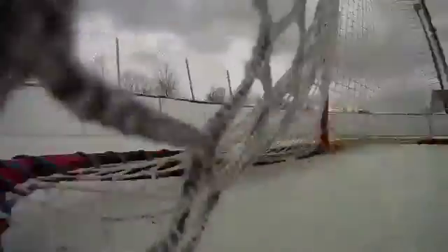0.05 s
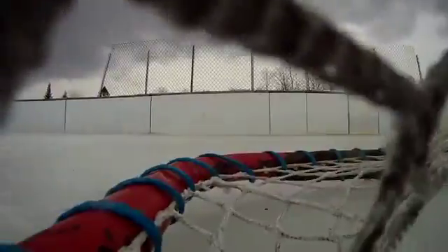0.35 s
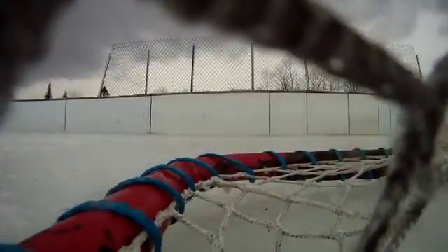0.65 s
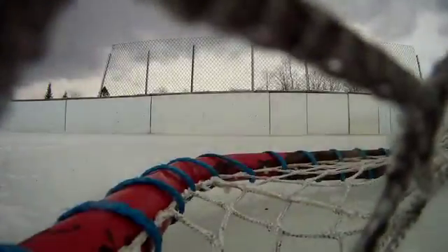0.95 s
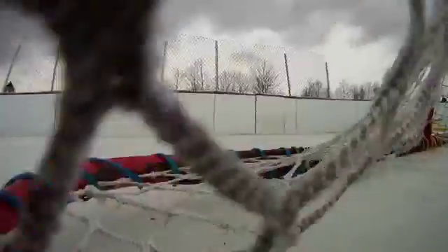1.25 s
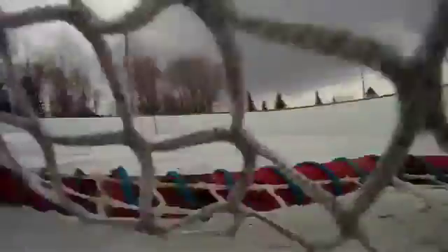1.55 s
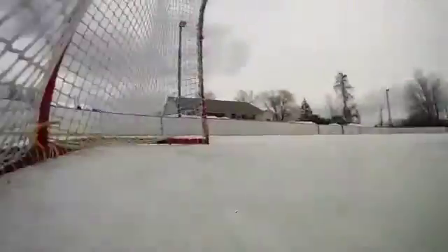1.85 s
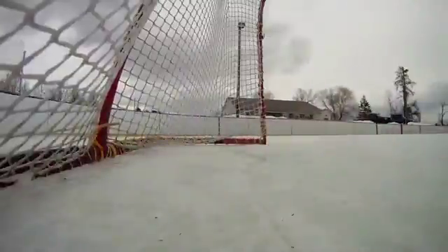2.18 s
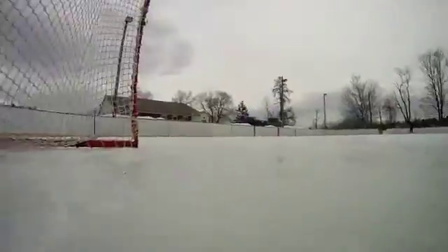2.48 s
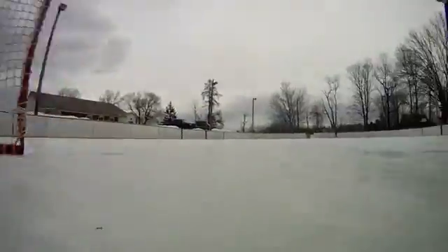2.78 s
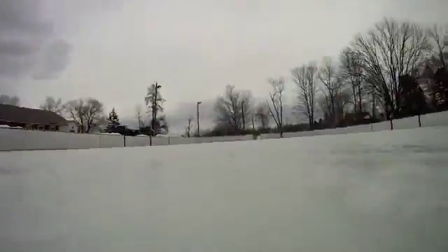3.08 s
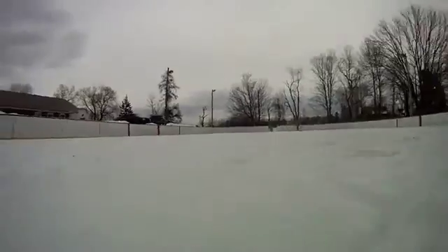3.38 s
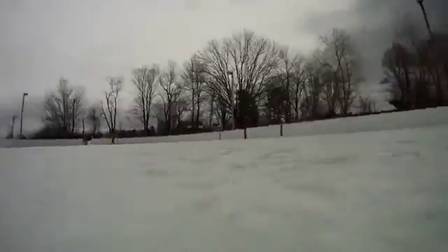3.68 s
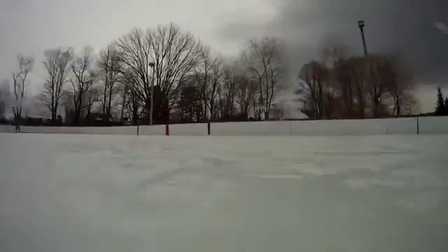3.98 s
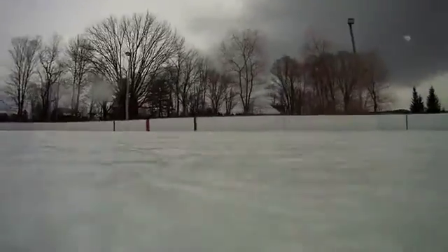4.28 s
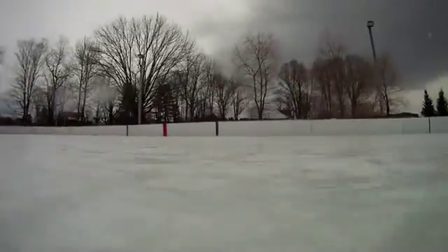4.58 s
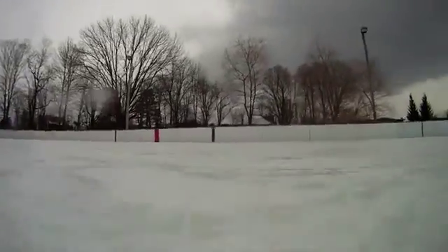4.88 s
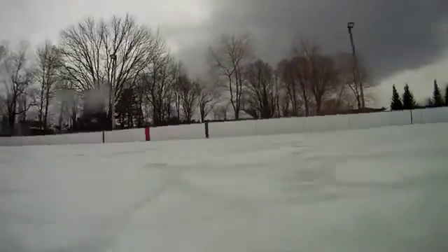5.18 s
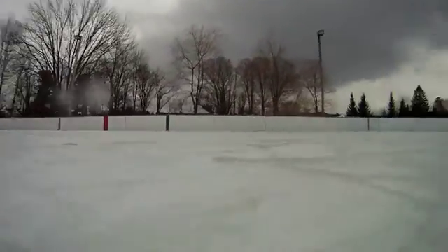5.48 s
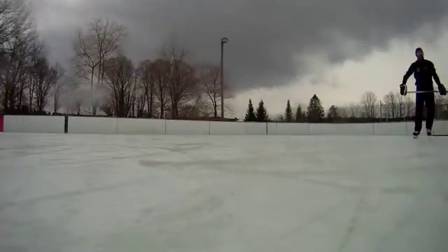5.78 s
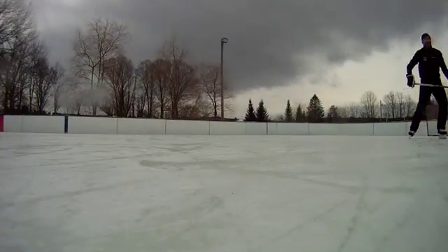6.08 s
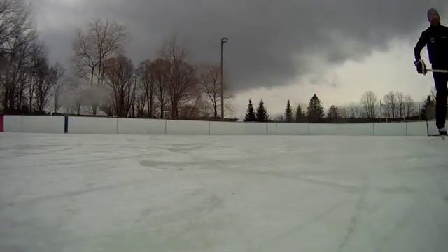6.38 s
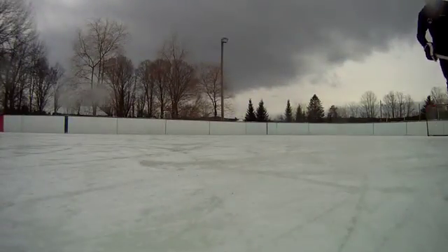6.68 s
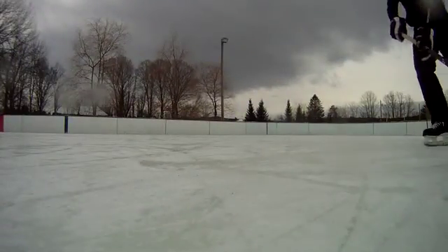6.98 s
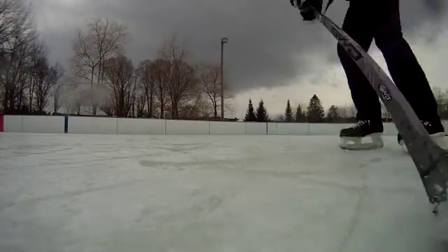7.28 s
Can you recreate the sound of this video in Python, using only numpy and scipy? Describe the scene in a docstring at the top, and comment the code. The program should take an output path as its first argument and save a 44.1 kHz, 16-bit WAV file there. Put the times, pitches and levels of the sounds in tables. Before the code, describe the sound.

A hockey puck grinds briefly over rough outdoor ice and pauses. Sharp stick knocks and a bright rub start a second scrape. After another crack comes a long, rumbling slide that turns into rapid rattling knocks and low thumps. It stops, and faint, muffled skate swishes and light taps approach. The microphone rides on the puck in a plastic housing, so every bump is loud and close.

```python
"""A puck carrying a small camera in a plastic housing is nudged, dragged and shot over rough outdoor ice.
It grinds and rumbles, then skips from bump to bump; each contact rings the housing, and the hardest
overload the microphone. The hockey stick rubs the housing, flat landings thump, the camera sways.
Skate blades and, once the puck lies still, light taps come dully through the wall over faint rink air."""
import sys
import numpy as np
from scipy import signal
from scipy.fft import rfft, irfft
from scipy.io import wavfile
from scipy.ndimage import uniform_filter1d

SR = 44100
rng = np.random.default_rng(int(sys.argv[2]) if len(sys.argv) > 2 else 0)


def master_out(mix):
    """Clip the mix to full scale and print it as 16-bit PCM to the path in sys.argv[1]."""
    frames = np.transpose(np.atleast_2d(mix))
    ceiling = np.clip(frames, -1, 1)
    pcm = np.round(ceiling * 32767).astype(np.int16)
    wavfile.write(sys.argv[1], SR, pcm)


N = 323694
TIME = np.arange(N) / SR


def amp(db):
    """Decibels to gain."""
    return 10 ** (np.asarray(db) / 20)


def unit_rms(x):
    """Scales to rms 1."""
    return x / np.sqrt(np.mean(x ** 2) + 1e-20)


def add(mix, start_s, sound):
    """Mixes a sound in at start_s."""
    part = mix[max(round(start_s * SR), 0):][:len(sound)]
    part += sound[:len(part)]


def body(spectrum, modes=(), size=4096):
    """Minimum-phase impulse response of energy 1: a broad spectrum plus resonances."""
    hz = np.fft.rfftfreq(size, 1 / SR)
    spectrum_hz, spectrum_db = np.transpose(spectrum)
    db = np.interp(np.log(hz + 1), np.log(spectrum_hz), spectrum_db)
    db += sum(lift / (1 + (2 * (hz - centre) / width) ** 2) for centre, width, lift in modes)
    cepstrum = irfft(np.log(amp(db)))
    cepstrum[1:size // 2] *= 2
    cepstrum[size // 2 + 1:] = 0
    response = irfft(np.exp(rfft(cepstrum)))[:size // 2]
    return response / np.linalg.norm(response)


def ring(force, response):
    """Plays a force through a body."""
    return signal.oaconvolve(force, response)[:N]


def wander(hz):
    """Smooth random drift up to about hz, rms 1."""
    lowpass = 1 / (1 + (np.fft.rfftfreq(N, 1 / SR) / hz) ** 4)
    return unit_rms(irfft(rfft(rng.standard_normal(N)) * lowpass, N))


def grains(per_s, spread_db):
    """Random tiny impacts of uneven size, rms 1."""
    size = amp(spread_db * np.clip(rng.standard_normal(N), -2, 2))
    return unit_rms(size * rng.choice([-1, 1], N) * (rng.random(N) < per_s / SR))


# wall transmission: f/Hz, level/dB
WALL_SPECTRUM = [(60, -9.5), (250, -6.5), (600, -12.5), (1200, -1.5), (1900, -7.5), (4000, -5.5),
                 (6000, -17.5), (8500, -7), (12000, -21.5), (14500, -13)]
# resonances of wall and enclosed air: f/Hz, width/Hz, lift/dB
WALL_MODES = [(275, 100, 12), (1390, 170, 7), (2380, 420, 9), (3380, 200, 8), (4760, 220, 5)]
def through_wall(force, source_modes):
    """An outside source rings with its own modes and is dulled by the housing wall."""
    return ring(force, body(WALL_SPECTRUM, [*WALL_MODES, *source_modes]))


# rink air: f/Hz, level/dB
AIR_SPECTRUM = [(18, -29.5), (30, -4), (122, -10), (448, -20), (4090, -25), (6040, -36.5), (15000, -36)]
def rink_air(level_db=-57.5):
    """Faint steady air of the open rink, coloured by the two lowest wall modes."""
    return amp(level_db) * ring(rng.standard_normal(N), body(AIR_SPECTRUM, WALL_MODES[:2]))


# blade resonances: f/Hz, width/Hz, lift/dB
BLADE_MODES = [(1120, 150, 3.5), (2250, 500, 3), (3540, 600, 2.5)]
# hollow note at full carve: f/Hz, width/Hz, lift/dB
CARVE_MODES = [(270, 100, 7), (1440, 140, 8)]
# glides, one list per pass: t/s, level/dB
GLIDES = [
    [(0.35, -36.5), (0.5, -50), (0.7, -54.5), (0.8, -47), (1.05, -38.5), (1.2, -56)],
    [(2.08, -58), (2.2, -47), (2.3, -35.5)],
    [(6.25, -65), (6.48, -58), (6.54, -50), (6.66, -45), (6.72, -52.5), (6.81, -50.5), (6.88, -64),
     (6.98, -58.5), (7.08, -46), (7.34, -43.5)],
]
def blades(carve_depths=(0.2, 0.1, 1)):
    """Skate blades swish nearby, hollower the deeper a pass carves."""
    out = np.zeros(N)
    friction = unit_rms(grains(per_s=5000, spread_db=3.5) * amp(2 * wander(hz=40)))
    for glide, depth in zip(GLIDES, carve_depths):
        level_db = np.interp(TIME, *np.transpose(glide), -100, -100)
        gain = uniform_filter1d(amp(level_db), size=1000)
        hollow = [(hz, width, lift * depth) for hz, width, lift in CARVE_MODES]
        out += through_wall(gain * friction, [*BLADE_MODES, *hollow])
    return out


# tap resonances: f/Hz, width/Hz, lift/dB
TAP_MODES = [(830, 460, 7), (1710, 440, 9), (3830, 89, 11.5)]
# taps of the approaching skater: t/s, relative level/dB
TAPS = [(6.982, -13.5), (7.032, -20), (7.045, -26), (7.064, -24.5), (7.146, -19.5), (7.188, -25.5),
        (7.221, -22), (7.246, -26), (7.283, -19), (7.319, -18.5)]
def taps(clack_s=0.0038, tail_s=0.032, trim_db=-7):
    """Short clacks on the ice die away over the rink."""
    force, t = np.zeros(N), np.arange(SR // 5) / SR
    decay = np.exp(-t / clack_s) + amp(-21.5) * np.exp(-t / tail_s)
    for start_s, db in TAPS:
        add(force, start_s, amp(db + trim_db) * decay * rng.standard_normal(len(t)))
    return through_wall(force, TAP_MODES)


# jolts as the puck starts or stops: t/s, level/dB
SWAYS = [(1.0, -26.5), (1.073, -24.5), (1.124, -21.5), (2.0, -18), (5.83, -19.5)]
def sways(nod_hz=61.4, t60_s=0.27):
    """A jolt sets the camera nodding on its mount."""
    out, t = np.zeros(N), np.arange(SR // 2) / SR
    nod = amp(-60 * t / t60_s) * np.sin(2 * np.pi * nod_hz * t)
    for start_s, db in SWAYS:
        add(out, start_s, amp(db) * nod)
    return out


# housing shaken from below: f/Hz, level/dB
HOUSING_SPECTRUM = [(80, -11.5), (450, -1.5), (900, -1), (1800, -2), (2900, -11), (4300, -17),
                    (6000, -29.5), (7700, -21), (10000, -17.5), (12000, -23), (13500, -20), (15500, -22.5)]
# housing resonances: f/Hz, width/Hz, lift/dB
HOUSING_MODES = [(1130, 240, 9), (2330, 380, 14), (3620, 400, 10), (4760, 150, 6), (7240, 120, 6),
                 (8480, 340, 9), (9665, 300, 14), (10860, 180, 9), (13140, 170, 9), (14335, 300, 15)]
def housing(extra_modes, scatter=False, scatter_hz=28, scatter_db=2):
    """Housing response; scatter shifts and weights its modes for one random point of contact."""
    modes = np.array(HOUSING_MODES)
    if scatter:
        modes = modes + np.array([scatter_hz, 0, scatter_db]) * rng.standard_normal(modes.shape)
    return body(HOUSING_SPECTRUM, [*modes, *extra_modes])


# stick taking hold of the puck: t/s, level/dB
STICK_RUB = [(1.44, -45), (1.48, -20.5), (1.535, -21), (1.55, -48)]
def stick_rub(bright_hz=6000, width_hz=3000, lift_db=15):
    """Fine, bright friction of the stick's blade along the housing."""
    gain = amp(np.interp(TIME, *np.transpose(STICK_RUB), -120, -120))
    return ring(gain * grains(per_s=5000, spread_db=3.5), housing([(bright_hz, width_hz, lift_db)]))


# first slide: t/s, grinding/dB, rumble/dB
NUDGE = [(0.0, -20.5, -17), (0.15, -24, -20.5), (0.19, -34, -30), (0.279, -24, -16), (0.33, -36.5, -30),
         (0.45, -56, -56)]
# second slide: t/s, grinding/dB, rumble/dB
DRAG = [(1.006, -50.5, -38), (1.2, -41, -37), (1.3, -35.5, -30.5), (1.42, -26, -29), (1.5, -17, -18),
        (1.58, -23.5, -20), (1.979, -21.5, -17.5), (2.036, -44, -37)]
# third slide: t/s, grinding/dB, rumble/dB
SHOT = [(2.321, -37.5, -17), (2.43, -36.5, -40.5), (2.52, -30, -29.5), (2.58, -24, -14.5),
        (2.809, -27.5, -19.5), (3.14, -23, -20.5), (3.22, -19, -31.5), (3.479, -24, -27),
        (3.65, -34.5, -27.5), (4.011, -25, -25), (4.159, -33, -32.5), (4.33, -20, -20), (4.62, -23.5, -23),
        (4.73, -28.5, -33), (5.15, -27.5, -25.5), (5.56, -34.5, -41), (5.754, -30.5, -29),
        (5.791, -57, -37)]
# rough patches: t/s, length/s, relative level/dB
ROUGH_PATCHES = [(2.032, 0.029, -40), (2.793, 0.031, -20.5), (2.887, 0.12, -24.5), (3.769, 0.048, -12),
                 (4.043, 0.026, -13), (4.418, 0.09, -17), (4.762, 0.038, -19), (4.843, 0.072, -18),
                 (4.976, 0.056, -19), (5.332, 0.044, -19), (5.425, 0.093, -19.5), (5.593, 0.094, -27.5),
                 (5.79, 0.042, -40)]
def pressure(layer, ramp_s=0.0058, patch_trim_db=-0.5):
    """Contact strength as a layer's gain: three slides, plus a surge on each rough patch."""
    column = {"grinding": 1, "rumble": 2}[layer]
    slides = map(np.array, (NUDGE, DRAG, SHOT))
    gain = sum(amp(np.interp(TIME, slide[:, 0], slide[:, column], -100, -100)) for slide in slides)
    for start_s, length_s, db in ROUGH_PATCHES:
        surge = np.clip(np.minimum(TIME - start_s, start_s + length_s - TIME) / ramp_s, 0, 1)
        gain = np.hypot(gain, amp(db + patch_trim_db) * surge)
    return gain


RELEASE_S = 3.18  # puck leaves the stick
# leaps clear of the ice: start/s, end/s
LEAPS = [(3.731, 3.76), (3.822, 3.876), (4.097, 4.156), (4.708, 4.755), (4.896, 4.918), (5.102, 5.125)]
def contact(light_db, leap_db=-16.5, fall_s=0.024, rebound_s=0.039):
    """Gain of the free puck: it rides light around each knock, longer for hard ones, and lifts in leaps."""
    light = np.zeros(N)
    for knock_s, db, _ in KNOCKS:
        if knock_s > RELEASE_S:
            stretch = amp(db) ** 0.39
            light[round((knock_s - fall_s * stretch) * SR):round((knock_s + rebound_s * stretch) * SR)] = 1
    aloft = sum((TIME > start_s) & (TIME < end_s) for start_s, end_s in LEAPS)
    return amp(uniform_filter1d(light_db * light + leap_db * aloft, size=200))


EDGE_HZ, EDGE_WIDTH_HZ = 5200, 4500  # bright band of an edge contact
def skitter(ticks_per_s=65, tick_s=0.0012, level_db=-23.5, fade_db_per_s=9.5):
    """After the shot the puck's edge ticks over small ridges, fading as it slows."""
    ridges_passed = np.cumsum(ticks_per_s * amp(5 * wander(hz=59.2))) / SR
    ticks = np.diff(np.floor(ridges_passed), prepend=0)
    ticks *= amp(3.5 * np.clip(rng.standard_normal(N), -1.5, 1.5))
    bursts = signal.lfilter([1], [1, -np.exp(-1 / (tick_s * SR))], ticks)
    sliding_free = (TIME > RELEASE_S) & (TIME < SHOT[-1][0])
    gain = sliding_free * amp(level_db - fade_db_per_s * (TIME - RELEASE_S))
    force = unit_rms(bursts * rng.standard_normal(N)) * gain * contact(light_db=-4)
    return ring(force, housing([(EDGE_HZ, EDGE_WIDTH_HZ, 6.9)]))


# ice under the puck: t/s, unevenness/dB, fizz/dB, rocking share/0-1
ICE = [(0, 3.5, 2, 0.44), (1.299, 2, 0.5, 0.98), (1.5, 2.5, 3.5, 0.64), (1.6, 2.5, -1, 0.1),
       (2.3, 2, -0.5, 1), (2.6, 2, 3.5, 0.03), (3.1, 5.5, -3, 0.12), (3.3, 9, 4.5, 0.55),
       (3.8, 5.5, -0.5, 0.35), (5.7, 2.5, 0.5, 0.54)]
def surface():
    """Unevenness, fizz and rocking share at each sample."""
    times_s, *columns = np.transpose(ICE)
    return [np.interp(TIME, times_s, column) for column in columns]


# judder over small bumps: f/Hz, level/dB
JUDDER_SPECTRUM = [(30, -24.5), (80, 1.5), (150, 0.5), (260, 0), (400, -13.5), (700, -23), (2000, -64)]
# rocking over long waves in the ice: f/Hz, level/dB
ROCKING_SPECTRUM = [(15, -13.5), (30, -7), (70, -2.5), (130, -10), (300, -38), (900, -69)]
def rumble():
    """Bumps shake the whole puck: quick judder and slow rocking, in shares set by the surface."""
    _, _, rocking_share = surface()
    gain = contact(light_db=-6.5) * pressure("rumble")
    judder, rocking = (ring(grains(per_s=730, spread_db=1.5) * gain, body(spectrum))
                       for spectrum in (JUDDER_SPECTRUM, ROCKING_SPECTRUM))
    return np.sqrt(1 - rocking_share) * judder + np.sqrt(rocking_share) * rocking


# grinding colour, weaker lowest mode and a rasp above: f/Hz, width/Hz, lift/dB
RASP_MODES = [(1150, 170, -3), (3780, 150, 2.5)]
def shifting_rim(force, points=4, shift_hz=25, shift_db=7):
    """Weight shifts between points of the rim; each rings the housing in its own colour."""
    weights = np.array([amp(shift_db * wander(shift_hz)) for _ in range(points)])
    thresholds = np.cumsum(weights ** 2, 0) / np.sum(weights ** 2, 0)
    touching = (rng.random(N) > thresholds).sum(0)
    return sum(ring(force * (touching == k), housing(RASP_MODES, scatter=True)) for k in range(points))


def grinding(split_hz=2400):
    """Ice crystals break under the puck, in clumps at ridges; fine ones tip the crunch towards fizz."""
    uneven_db, fizz_db, _ = surface()
    crunch = unit_rms(grains(per_s=2500, spread_db=5.0) + .5 * rng.standard_normal(N))
    coarse = signal.sosfiltfilt(signal.butter(1, split_hz, fs=SR, output="sos"), crunch)
    force = amp(-fizz_db / 2) * coarse + amp(fizz_db) * (crunch - coarse)
    ridges = amp(uneven_db * np.clip(wander(hz=97), -2, 2))
    ridges /= np.sqrt(uniform_filter1d(ridges ** 2, size=SR // 10))  # bunches friction, adds no power
    return shifting_rim(force * ridges * pressure("grinding") * contact(light_db=-4.5))


# flat landings: t/s, peak/dB, f/Hz
THUMPS = [(0.154, -4.5, 96), (1.768, -7, 123), (2.356, -7.5, 120), (2.4, -8, 169), (2.568, -8.5, 200),
          (2.75, -6.5, 148), (2.906, -4, 260), (3.002, -1.5, 198), (3.092, -5, 150), (3.156, -3.5, 190),
          (3.559, -1.5, 208), (4.12, -1, 134), (4.615, -6, 124), (4.881, -1, 238), (5.271, -5, 158),
          (5.444, -7.5, 135), (5.52, -1, 130)]
def thumps(lead_s=0.02):
    """A flat landing squeezes the housing: one push and one pull of air."""
    out, t = np.zeros(N), np.arange(-lead_s, lead_s, 1 / SR)
    for centre_s, db, hz in THUMPS:
        phase = 2 * np.pi * hz * t
        add(out, centre_s - lead_s, -amp(db) * phase * np.exp((1 - phase ** 2) / 2))
    return out


def chatter(length_s, bite_s=0.0007, release_s=0.0024, size=2048):
    """Force of one contact: a bite, a few ms of rattling, a quick release."""
    t = np.arange(size) / SR
    bite = 1 - np.exp(-t / bite_s)
    decay = np.exp(-.6 * t / length_s)
    release = np.exp(-np.maximum(t - 0.74 * length_s, 0) / release_s)
    rattle = rng.standard_normal(size) * amp(5.84 * np.clip(rng.standard_normal(size), -2, 2))
    return bite * decay * release * rattle


# dull part of a knock: f/Hz, level/dB
CLUNK_SPECTRUM = [(60, -9.5), (250, -1.5), (600, -8), (900, -9), (2000, -22.5), (6000, -60)]
# hard contacts with stick and ice: t/s, level/dB, clunk re level/dB
KNOCKS = [(1.226, 6, -24), (1.241, -6, -15.5), (1.539, -5.5, -9), (2.307, 4.5, -19), (2.319, -13, -2),
          (2.356, -23.5, 1), (2.395, -25.5, 3.5), (2.564, -11.5, -3), (2.809, -13.5, 4), (3.195, -9, 0),
          (3.211, -4, -16), (3.239, -14, -6), (3.268, -16.5, -26), (3.333, -9, -51), (3.403, -7.5, -21),
          (3.429, -13, -8.5), (3.45, -11.5, -28), (3.465, -13, -23), (3.556, -14.5, 3.5),
          (3.586, -10.5, -11), (3.61, -15, -6), (3.671, -9.5, -10), (3.699, -5, -10), (3.718, -11, -5.5),
          (3.765, -10.5, -6.5), (3.806, -10.5, -6), (3.85, -3.5, -7), (3.883, -8, -15),
          (3.918, -16.5, -2.5), (3.954, -10.5, -4.5), (4.115, -13.5, -5), (4.193, -20.5, -1.5),
          (4.249, -14.5, -13), (4.299, -12.5, -3), (4.342, -16, -27), (4.481, -8, -1.5), (4.555, -14.5, -8),
          (4.594, -7, -3), (4.686, -6, -3), (4.812, -12, -1.5), (4.878, -2.5, -4.5), (5.032, -8, -2),
          (5.068, -4.5, 1), (5.087, -15.5, -19), (5.186, -16, -25), (5.202, -14.5, 2.5), (5.269, -7, -16)]
def knocks(contact_s=0.008, doubling_db=38.5, rms_span_s=0.0065):
    """Each contact rings the housing and clunks; a flat, dull landing lasts longer than an edge tick."""
    out, clunk = np.zeros(N), body(CLUNK_SPECTRUM)
    for start_s, db, clunk_db in KNOCKS:
        crack = (3300, 1500, 0.8 * max(db + 5, 0))  # hardest blows are brighter
        edge = (EDGE_HZ, EDGE_WIDTH_HZ, .25 * max(-clunk_db - 10, 0))  # less clunk, more edge
        shell = housing([crack, edge], scatter=True)
        force = chatter(length_s=contact_s * 2 ** (clunk_db / doubling_db))
        for response, part_db in ((shell, db), (clunk, db + clunk_db)):
            sound = signal.fftconvolve(force, response)
            add(out, start_s, amp(part_db) * np.sqrt(rms_span_s * SR) * sound / np.linalg.norm(sound))
    return out


def scene():
    """Puck, skater and rink at the one microphone."""
    puck = grinding() + rumble() + skitter() + stick_rub() + knocks() + thumps() + sways()
    return (puck + blades() + taps() + rink_air())[None]


def record(dry):
    """The microphone port cuts two treble bands, the hardest blows overload, a low-pass limits the band."""
    port_null_hz, cutoff_hz = 6030, 15500
    for null_hz in (port_null_hz, 2 * port_null_hz):
        dry = .25 * dry + .75 * signal.lfilter(*signal.iirnotch(null_hz, Q=10, fs=SR), dry)
    clipped = dry / (1 + dry ** 8) ** (1 / 8)
    lowpass = signal.firwin(511, cutoff_hz, window=("kaiser", 8), fs=SR)
    return signal.oaconvolve(clipped, lowpass[None], "same")


dry = scene()
out = record(dry)
master_out(out)
```